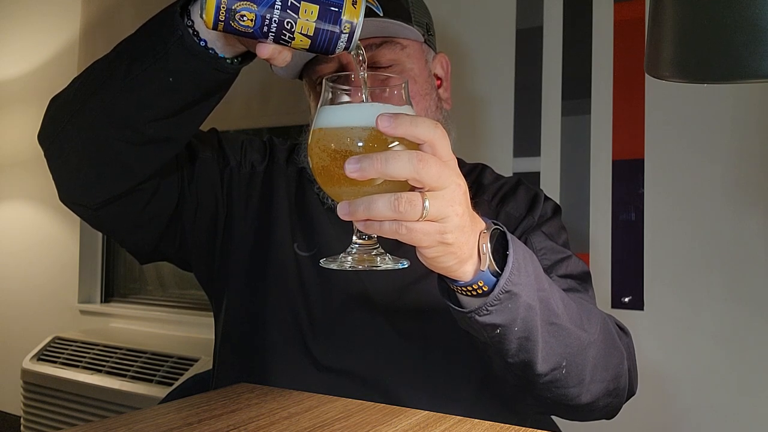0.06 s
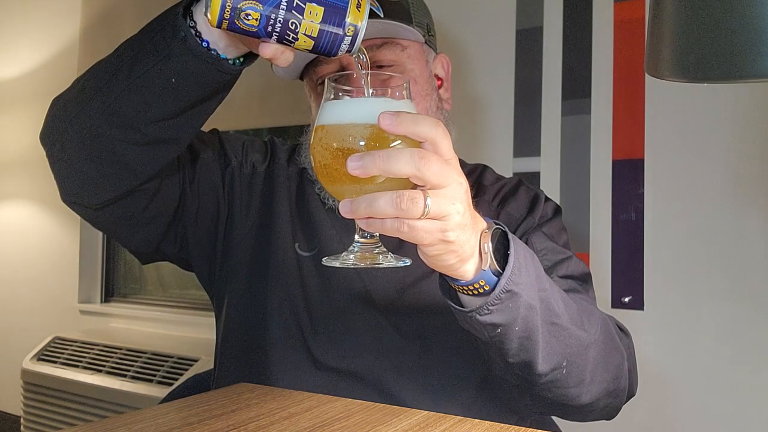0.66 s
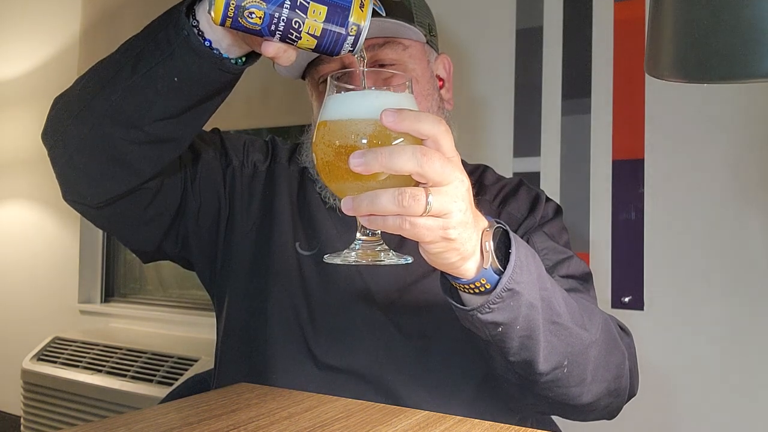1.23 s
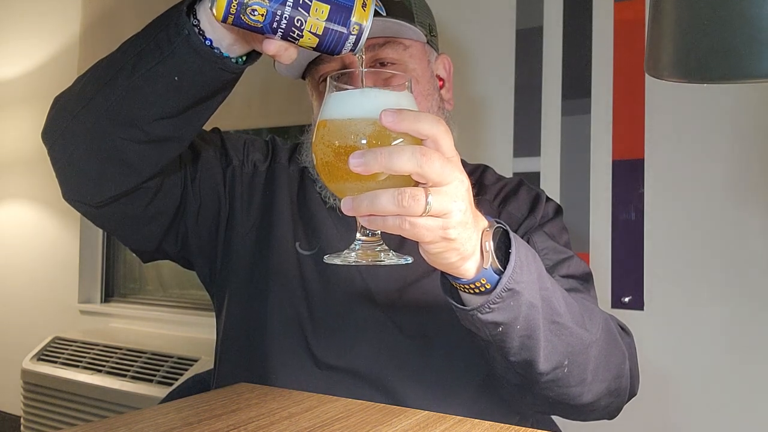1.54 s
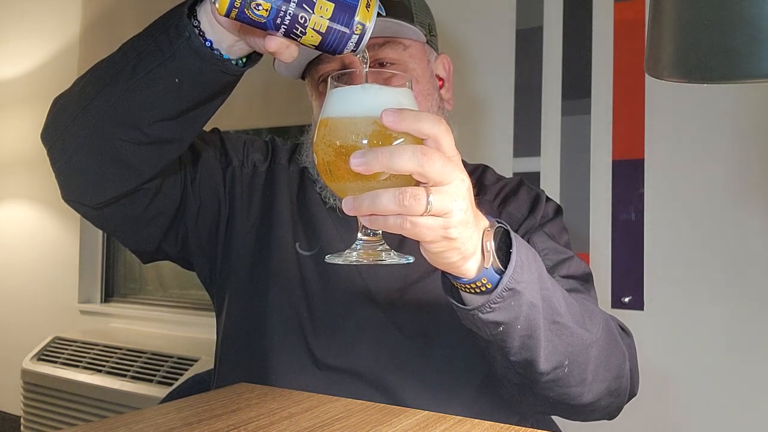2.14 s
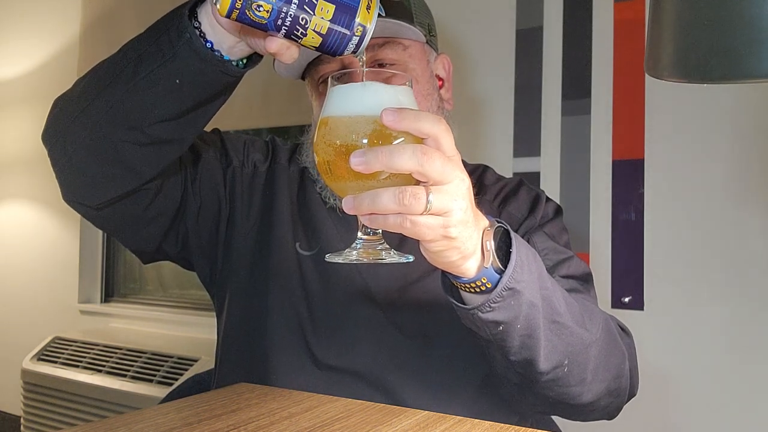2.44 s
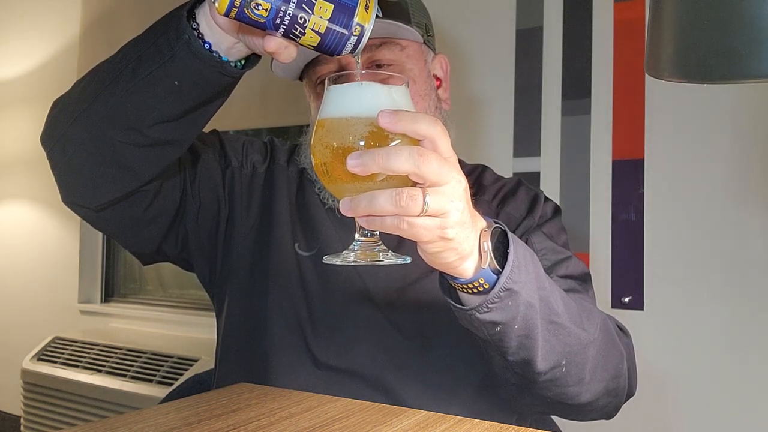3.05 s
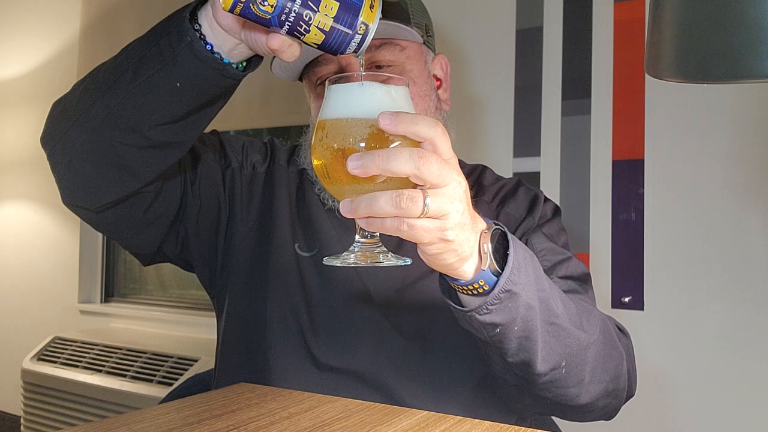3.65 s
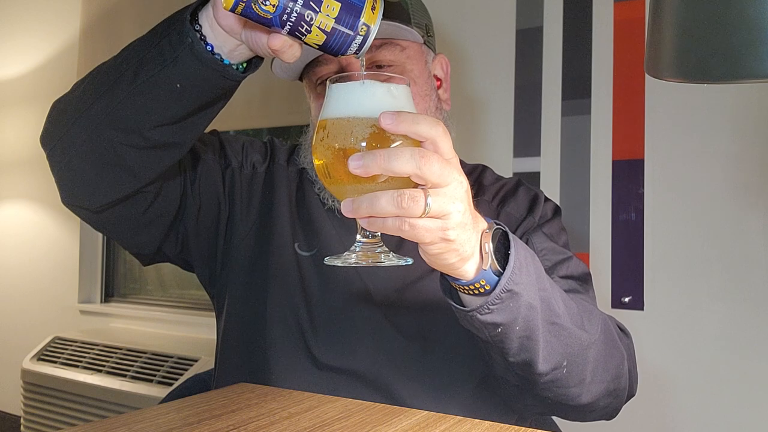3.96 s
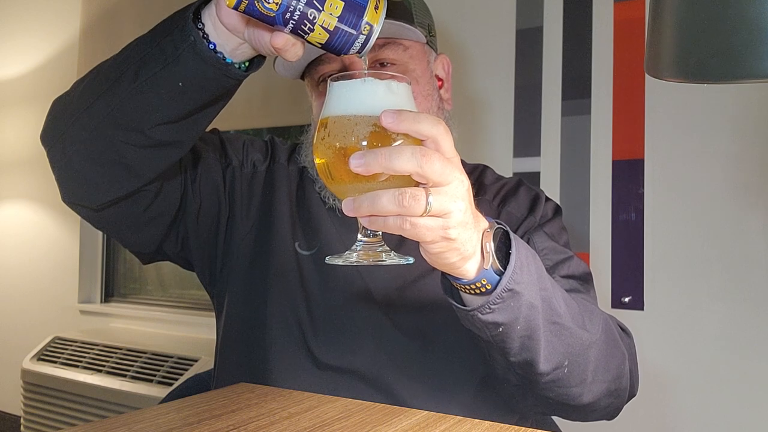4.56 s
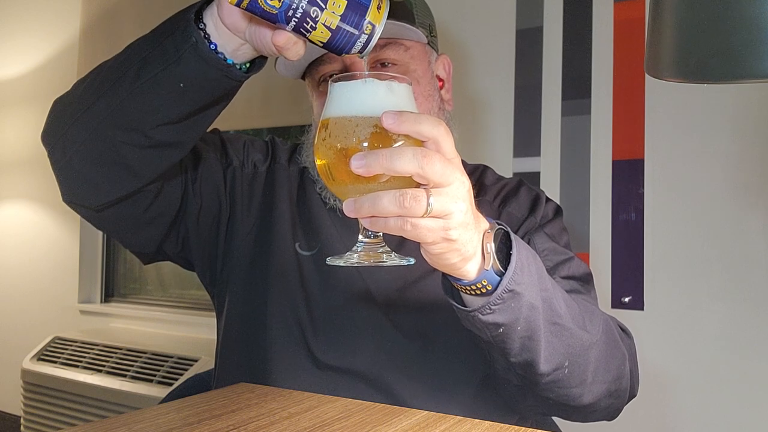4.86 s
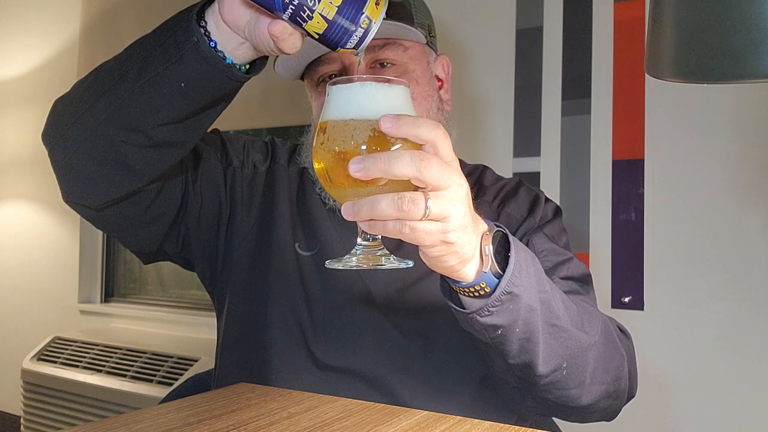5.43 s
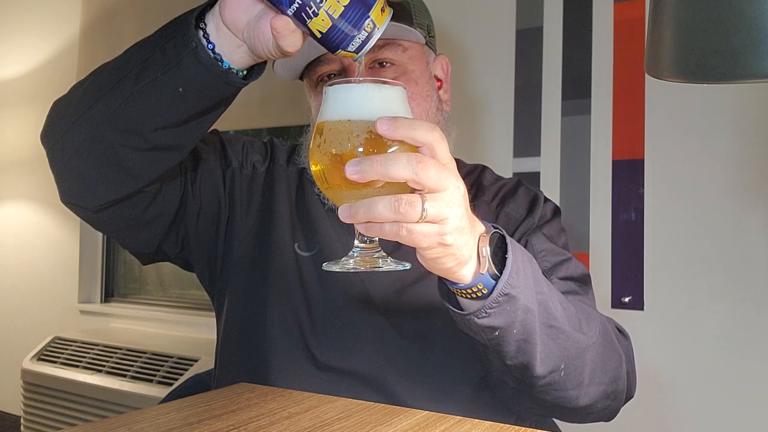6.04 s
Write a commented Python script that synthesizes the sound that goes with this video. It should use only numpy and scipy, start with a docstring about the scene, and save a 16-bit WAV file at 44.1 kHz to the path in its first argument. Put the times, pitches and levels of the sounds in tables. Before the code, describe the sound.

A wall air-conditioner runs steadily in a small room, with a deep, gently swaying fan hum, a low rumble, a thin motor buzz and rushing air. Near the microphone, beer poured softly from a can onto its foam makes a faint fizz with a few tiny pops. Twice, a soft high hiss swells from the air-conditioner and fades.

```python
"""A wall air-conditioner hums steadily in a small room: three deep, swaying fan tones over a rumbling
casing, the thin buzz of its compressor and motors, and air rushing through the grille.
Nearby, beer runs softly from a can onto its own foam, heard as a faint fizz of bursting bubbles.
Twice, the refrigerant (the cooling fluid) swells to a soft hiss in its coil."""
import sys
import numpy as np
from scipy import signal
from scipy.fft import rfft, irfft, next_fast_len
from scipy.io import wavfile
from scipy.ndimage import uniform_filter1d, map_coordinates

SR = 44100
rng = np.random.default_rng(int(sys.argv[2]) if len(sys.argv) > 2 else 0)


def dump(signal):
    """Clip the signal to [-1, 1] and save it as 16-bit WAV at the path in sys.argv[1]."""
    limited = np.clip(np.atleast_2d(signal).T, -1, 1)
    pcm = np.round(limited * 32767).astype(np.int16)
    wavfile.write(sys.argv[1], SR, pcm)


N = 277830
TIME_S = np.arange(N) / SR
TOP_HZ = 15720  # highest pitch kept
SIDES = np.array([[.5], [-.5]])  # half up on the left, half down on the right


def amp(db):
    """Turn decibels into a number to multiply by."""
    return 10 ** (np.asarray(db) / 20)


def unit(x):
    """Scale a signal to an average power of one."""
    return x / np.sqrt(np.mean(x ** 2) + 1e-30)


def along(points, hz):
    """Read between (pitch_hz, value) points, spaced by octaves."""
    pitches, values = np.transpose(points)
    return np.interp(np.log(hz + 1), np.log(pitches + 1), values)


def wobble(rate):
    """A smooth curve through `rate` random values a second."""
    knots = rng.standard_normal(1024)
    coarse = np.linspace(0, N, 4096)
    return np.interp(np.arange(N), coarse, map_coordinates(knots, [coarse * rate / SR], mode="wrap"))


def filtered(x, response):
    """Scale each pitch by response(hz); mirrored ends keep the edges smooth."""
    edge = 8192
    wide = np.pad(x, ((0, 0), (edge, edge)), mode="reflect", reflect_type="odd")
    size = next_fast_len(N + 2 * edge)
    return irfft(rfft(wide, size) * response(np.fft.rfftfreq(size, 1 / SR)), size)[:, edge:edge + N]


def turning(hz):
    """The angle of something that turns at a changing rate."""
    return 2 * np.pi * (np.cumsum(hz) / SR + rng.random())


def fan(blade_hz=67.48, drift=.001, flutter_hz=6, fade_s=.09, pan_db=-.93, lag_rad=.17):
    """Each passing blade sends out a rounded sawtooth of pressure, whose shape slowly sways."""
    # three tones; as the second swells the others give way: level_db, db_per_sway_db, flutter_db
    blade_tones = [(-34, -0.2, 0.38), (-35.5, 1, 0.55), (-40, -0.27, 1)]
    # slow sway of the second tone: time_s, change_db
    sway = [(0, -2), (0.5, -2), (0.82, -4), (1.2, -4), (1.6, 1.5), (2.6, 2.2), (3.25, -1), (3.65, 2.1),
            (4.1, -1.1), (4.55, 1.2), (5.0, -0.9), (5.33, 1.5), (5.78, -5), (6.3, -4.5)]
    # brief dips of the third tone: middle_s, depth_db
    fades = [(2.0, 3), (2.81, 7), (4.56, 3.8)]
    angle = turning(blade_hz * (1 + drift * wobble(1.508)))
    sway_db = np.interp(TIME_S, *np.transpose(sway))
    levels = [db + follows * sway_db + flutter * wobble(flutter_hz)
              for db, follows, flutter in blade_tones]
    levels[2] -= sum(depth * np.exp(-.5 * ((TIME_S - middle) / fade_s) ** 2) for middle, depth in fades)
    hum = sum(-amp(db) * np.sin(k * angle + lag_rad * SIDES) for k, db in enumerate(levels, 1))
    return np.sqrt(2) * hum * amp(pan_db * SIDES)


def tone(angle, hz, left_db, right_db, lag_rad):
    """The room brings a tone to each ear differently; high tones waver more in the moving air."""
    waver = np.clip(hz / 2000, .15, .4)
    gain = (1 + waver * (wobble(7) + 1j * wobble(7))) / np.sqrt(1 + 2 * waver ** 2)
    phase = angle + lag_rad * SIDES + 2 * np.pi * rng.random()
    return np.sqrt(2) * amp([[left_db], [right_db]]) * np.imag(gain * np.exp(1j * phase))


def compressor(shaft_hz=58.345, drift=.00029):
    """The piston buzzes at whole multiples of one almost steady shaft speed."""
    # piston tones: shaft_multiple (rounded below), left_db, right_db, lag_between_ears_rad
    piston_tones = [(2, -55.5, -49, .2), (3, -53.5, -54.5, .1), (4, -57, -58, .5), (4.9, -68.5, -62.5, 2.6),
                    (5.8, -58, -61, .4), (13, -73.5, -72, 3), (14, -64.5, -62, 2.47),
                    (14.8, -78.5, -66, 1.3), (15.8, -65.5, -67.5, 0.62), (17, -64, -68, 2.7),
                    (17.9, -74.5, -69.5, .3), (22.6, -76, -79, 3.4), (22, -77, -75.5, 3),
                    (23, -82.5, -74, 0.83), (25, -90, -75, 1.4), (55, -86.5, -86, .2),
                    (57.3, -85.5, -84, .4), (59, -85.5, -94, .9), (62, -92, -86.5, 2.2),
                    (106, -91, -95.5, .8), (116, -95, -95, 2.9)]
    angle = turning(shaft_hz * (1 + drift * wobble(2)))
    return sum(tone(round(k) * angle, k * shaft_hz, *arrival) for k, *arrival in piston_tones)


def motors(drift=.0004):
    """Motors, mains power and bearings add tones that throb against the compressor."""
    # their tones: pitch_hz
    pitches = [59.4, 80.8, 120, 178.3, 236.7, 360, 902.6, 2432.9, 3026.3, 3085.6, 3263.6]
    # how each tone arrives: left_db, right_db, lag_between_ears_rad
    arrivals = [(-52, -44.5, 1), (-61, -58, .3), (-56, -56, .4), (-57, -56, .2), (-63.5, -62.5, 0.46),
                (-64.5, -63.5, 1.9), (-76.5, -71.5, 1.5), (-77.5, -91.5, 1.5), (-87, -94.5, .1),
                (-87, -83, .8), (-79.5, -83, 3.3)]
    speed = 1 + drift * wobble(2)
    return sum(tone(turning(hz * speed), hz, *arrival) for hz, arrival in zip(pitches, arrivals))


def air(patchy_db=1.18):
    """Swirling air booms in the casing and hisses at the grille; only the bass is alike in both ears."""
    # low rumble in the casing: pitch_hz, level_db_per_hz
    rumble = [(20, -79.5), (42, -72), (52, -69.5), (80, -62), (96, -64.5), (106, -74.5), (118, -61),
              (142, -59.5), (158, -70.5), (180, -63), (215, -69), (232, -68.5), (255, -74), (280, -77)]
    # rush in the duct: pitch_hz, level_db_per_hz
    duct = [(310, -71), (370, -75.5), (410, -76), (510, -77.0), (580, -79.5), (660, -83), (710, -79),
            (800, -83), (1100, -83.5), (1400, -89), (1550, -92), (1720, -92.5), (2050, -97.5), (2750, -99)]
    # high hiss at the grille: pitch_hz, level_db_per_hz
    grille = [(3200, -99.8), (3650, -102), (4150, -109.3), (4330, -106.8), (4700, -110), (5700, -111.8),
              (6400, -106.8), (7250, -106.8), (7700, -114.8), (8250, -129), (9400, -127.5), (10850, -136),
              (12500, -132.3), (15500, -131.8)]
    # how wide the air sounds: pitch_hz, side_minus_middle_db
    widths = [(25, -6.5), (50, -10.5), (87, -12.5), (140, -14), (200, -12.5), (270, -7), (390, 2), (570, 6),
              (820, 4), (1100, 3), (1740, 4.5), (2540, 1.1), (3690, 0), (7800, 2)]
    # which way it leans: pitch_hz, left_minus_right_db
    tilt = [(60, -0.5), (93, 1), (150, -1), (230, -4), (350, 1), (550, -2), (850, -3), (1330, -3.5),
            (2070, -2.0), (3220, -1.5), (5010, -2), (7800, 3.5)]
    # make the noise a little louder or softer in random patches of pitch and time
    spectrum = signal.stft(rng.standard_normal((2, N)), nperseg=512)[2]
    patches = uniform_filter1d(rng.standard_normal(spectrum.shape[1:]), size=5, axis=0)
    patches = uniform_filter1d(patches, size=16, axis=1)
    noise = signal.istft(spectrum * amp(patchy_db * unit(patches)), nperseg=512)[1][:, :N]

    def colour(hz):
        width = amp(along(widths, hz))
        shares = np.array([np.ones_like(hz), width]) / np.hypot(1, width)
        return amp(along(rumble + list(duct) + grille, hz)) * shares

    middle, side = filtered(noise * np.sqrt(SR / 2), colour)
    left_right = np.array([middle + side, middle - side])
    return filtered(left_right, lambda hz: amp(SIDES * along(tilt, hz)) * walls(hz))


def walls(hz, ripple_db=2.0, step_hz=28):
    """Wall echoes boost some pitches and weaken others, differently at each ear; bass is barely touched."""
    knots = rng.standard_normal((2, 2048))
    ripple = np.array([np.interp(hz / step_hz, np.arange(len(ear)), ear) for ear in knots])
    return amp(ripple_db * ripple * np.clip(hz / 1500, 0, 1))


def bubbles(starts_s, sizes, pitch_hz, spread, cycles):
    """Each bursting bubble rings for a few cycles at its own pitch and place."""
    detune, pan, lag = np.hsplit(rng.standard_normal((len(starts_s), 3)), 3)
    hz = np.clip(pitch_hz * np.exp(spread * detune), 1500, TOP_HZ)
    age = np.arange(128)  # in samples
    turns = hz * age / SR
    ring = sizes[:, None] * np.exp(-turns / cycles)
    at = ((starts_s * SR).astype(int)[:, None] + age).ravel()
    ears = [ring * amp(3 * side * pan) * np.sin(2 * np.pi * turns + 2 * side * lag) for side in SIDES]
    return np.array([np.bincount(at, ear.ravel(), N)[:N] for ear in ears])


def foam(bubbles_per_s=1500, size_spread_db=3.0, fizz_db=-94.5, growth_db_per_s=.4,
         flurry_db=1.6, flurries_per_s=14, pop_boost_db=1, pan_db=1.0):
    """Tiny bubbles burst in flurries, louder as the beer's foam builds; a few larger ones pop singly."""
    # tone colour of the fizz: pitch_hz, gain_db
    colour = [(1500, -24), (3500, 5), (7200, 4.5), (8200, -2.5), (9400, 0), (10000, -9.5), (10450, 1.5),
              (10900, -12.5), (15500, -12.5)]
    # the larger bubbles: start_s, level_db (before the boost)
    big_bubbles = [(0.6, -72), (1.7194, -78.5), (1.9494, -76.5), (2.7994, -81.5), (3.6694, -79),
                   (3.8797, -76), (4.1794, -80), (4.8229, -78), (5.3594, -77)]
    when, rarity = rng.random((int(bubbles_per_s * N / SR), 2)).T
    sizes = amp(-size_spread_db * np.log(np.maximum(rarity, .02)))
    fizz = bubbles(when * N / SR, sizes, pitch_hz=8000, spread=.3, cycles=4)
    fizz = filtered(fizz, lambda hz: amp(along(colour, hz)) * walls(hz))
    fizz /= np.std(filtered(fizz, lambda hz: (hz > 8300) & (hz < 11000)))  # fizz_db refers to this band
    starts_s, levels_db = np.transpose(big_bubbles)
    pops = bubbles(starts_s, amp(levels_db + pop_boost_db), pitch_hz=8800, spread=.1, cycles=9)
    loudness = amp(fizz_db + growth_db_per_s * TIME_S + flurry_db * wobble(flurries_per_s))
    return room(loudness * fizz + pops) * amp(pan_db * SIDES)


def room(x, echo_db=1, die_away_s=.25):
    """The small room blurs each tick with a short wash of echoes."""
    t = np.arange(SR // 4) / SR
    tail = rng.standard_normal((2, len(t))) * amp(-60 * t / die_away_s)
    echo = signal.fftconvolve(x, tail / np.linalg.norm(tail[0]), axes=1)[:, :N]
    return (x + amp(echo_db) * echo) / np.hypot(1, amp(echo_db))


def refrigerant(pitch_hz=3800, width_hz=185, rest_db=-91, boost_db=1, rise_s=.15, fall_s=.06):
    """A narrow hiss in the cooling coil rises, holds and falls with each surge of fluid."""
    # two soft surges: start_s, hold_s, level_db (before the boost)
    surges = [(1.45, .08, -74.5), (4.079, 0.32, -76)]
    hiss = filtered(rng.standard_normal((2, N)),
                    lambda hz: np.exp(-.5 * ((hz - pitch_hz) / width_hz) ** 2))
    swells = np.zeros(N)
    for start_s, hold_s, level_db in surges:
        rise = np.exp(-np.maximum(start_s - TIME_S, 0) / rise_s)  # full by start_s
        fall = np.exp(-np.maximum(TIME_S - start_s - hold_s, 0) / fall_s)
        swells += amp(level_db + boost_db) * rise * fall
    return np.hypot(amp(rest_db), swells) * unit(hiss)


def scene():
    """The air-conditioner and the beer sound together."""
    return fan() + compressor() + motors() + air() + refrigerant() + foam()


def record(dry):
    """Ease both ends over a few milliseconds and cut the very highest treble."""
    ease = signal.windows.tukey(N, .002)
    return filtered(dry * ease, lambda hz: hz < TOP_HZ)


dry = scene()
out = record(dry)
dump(out)
```